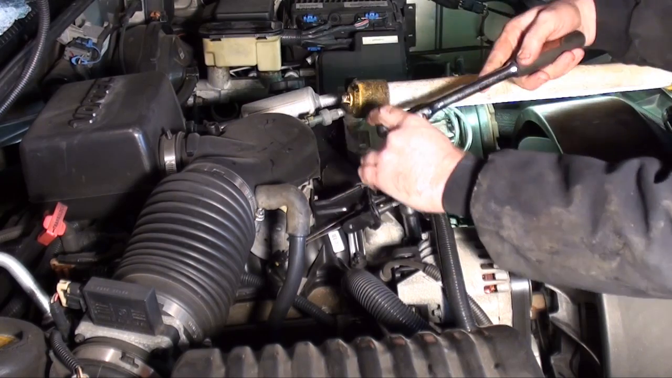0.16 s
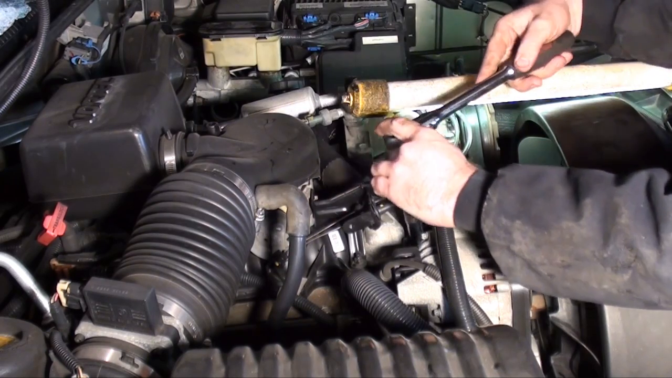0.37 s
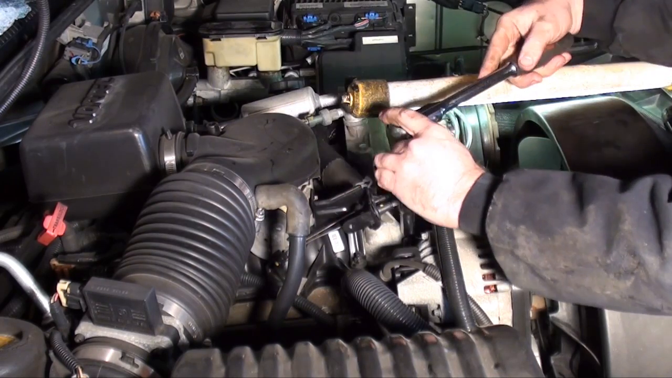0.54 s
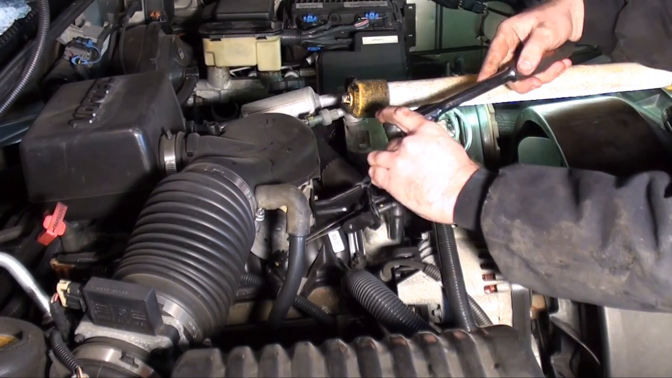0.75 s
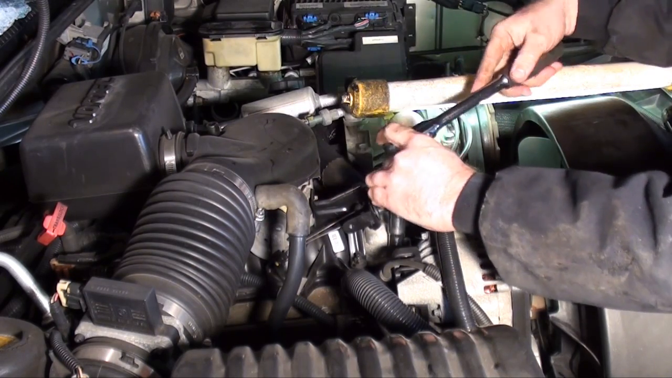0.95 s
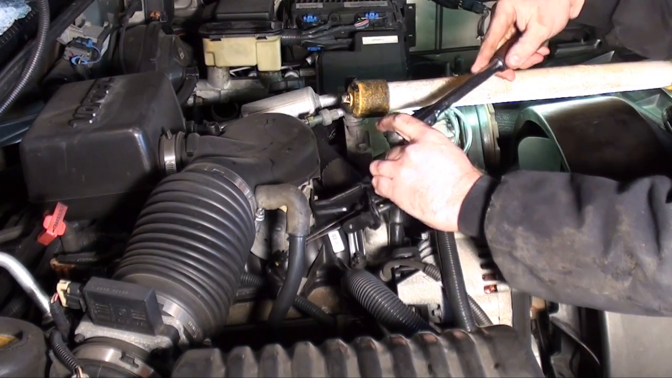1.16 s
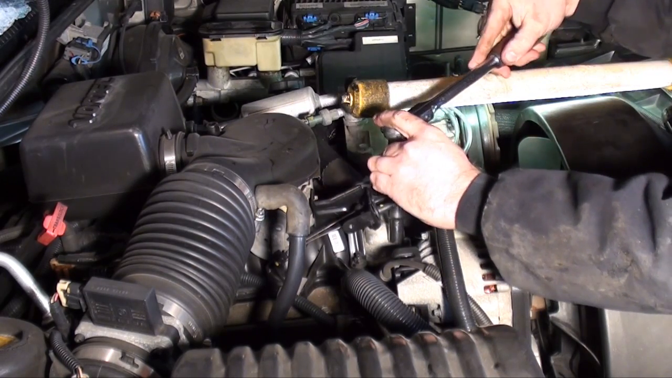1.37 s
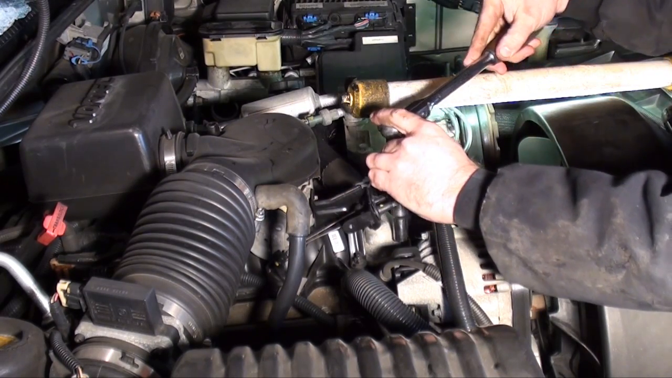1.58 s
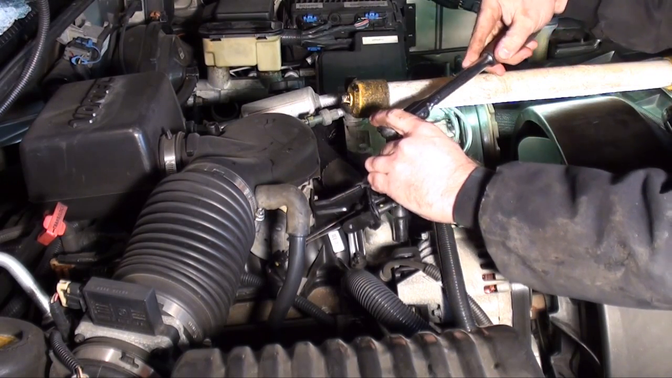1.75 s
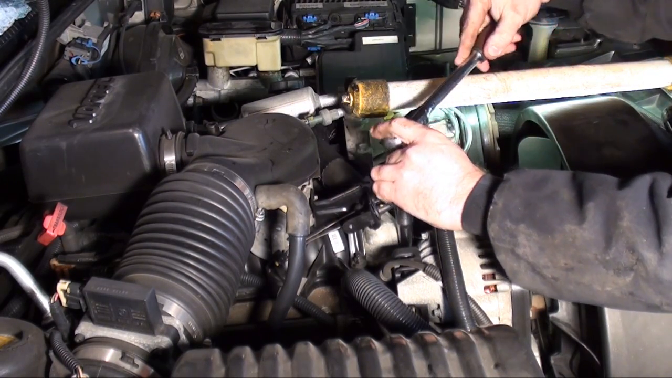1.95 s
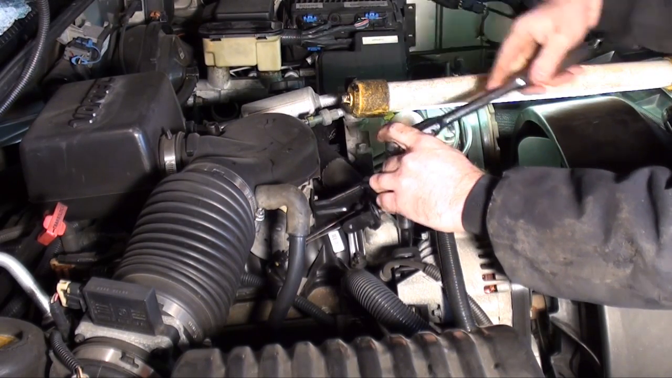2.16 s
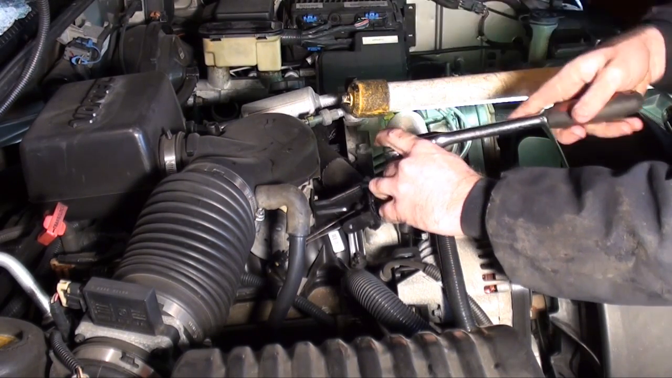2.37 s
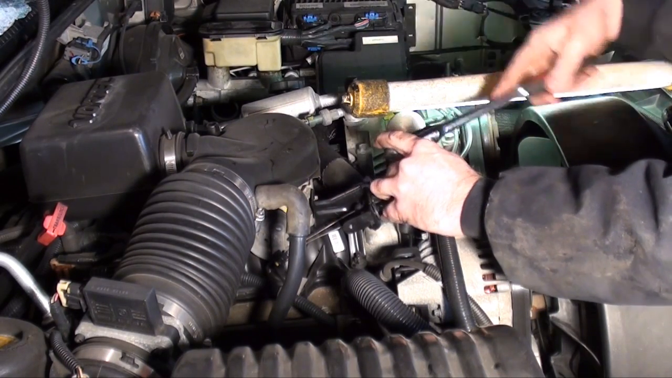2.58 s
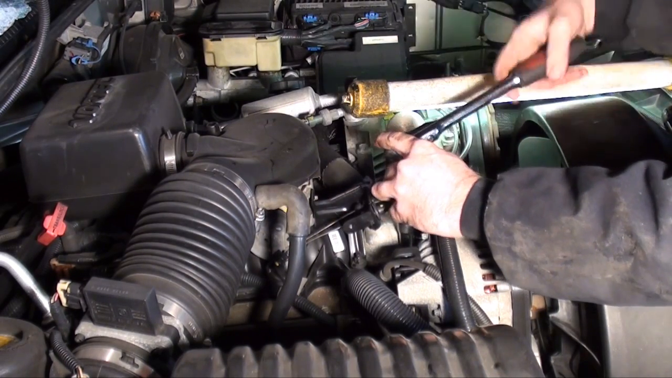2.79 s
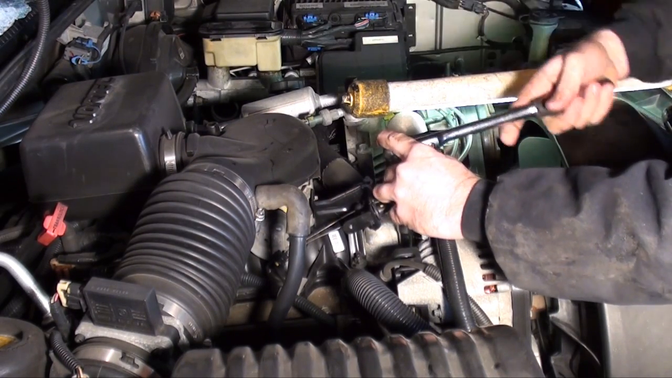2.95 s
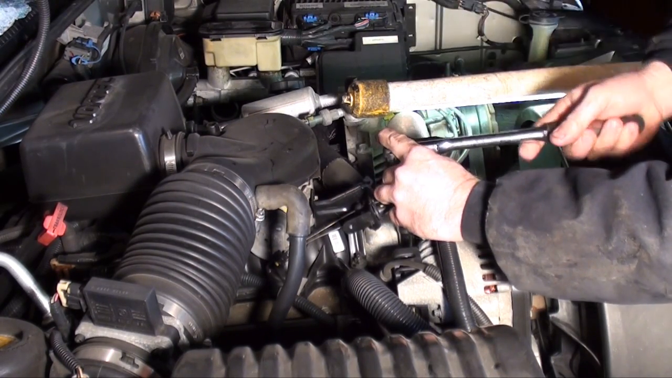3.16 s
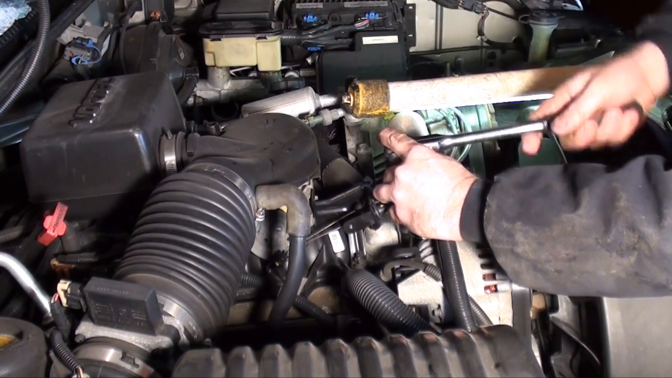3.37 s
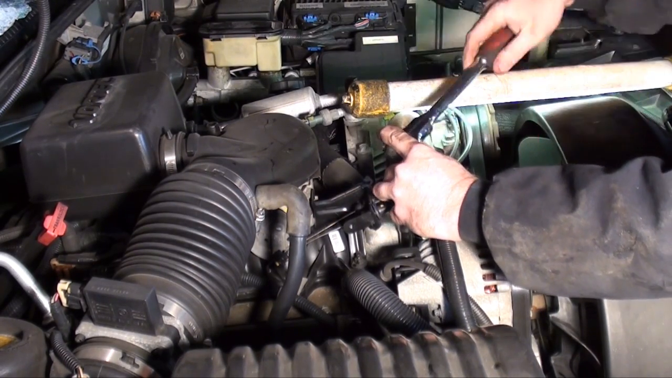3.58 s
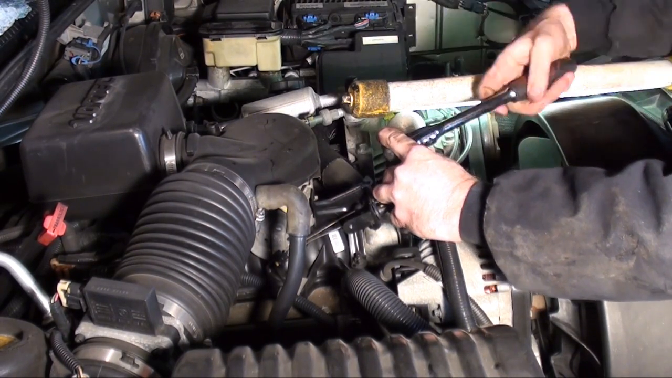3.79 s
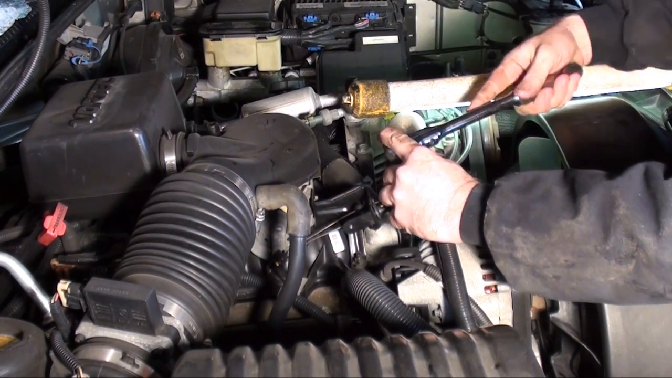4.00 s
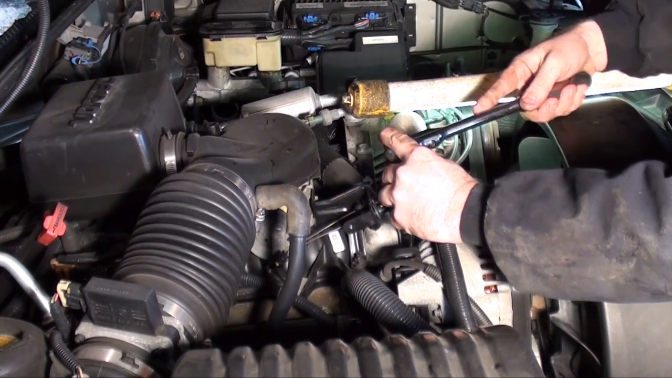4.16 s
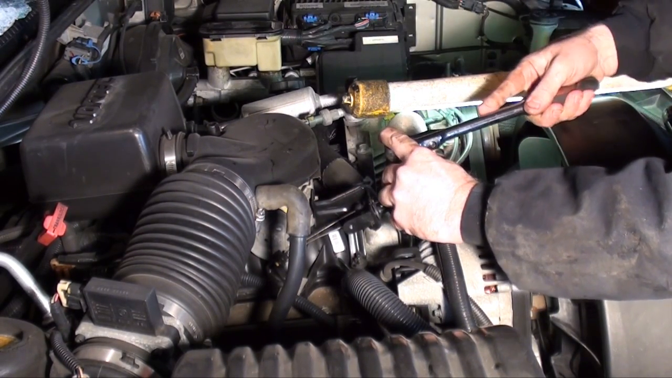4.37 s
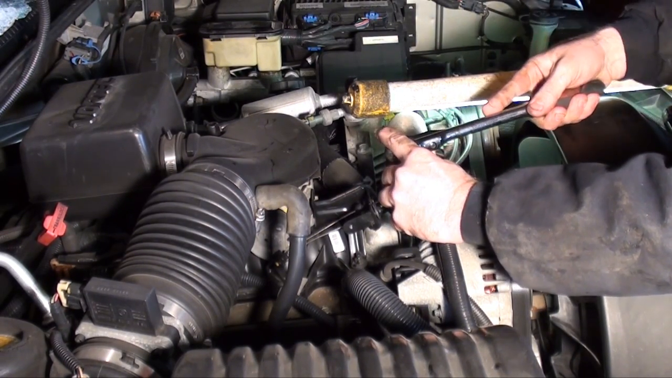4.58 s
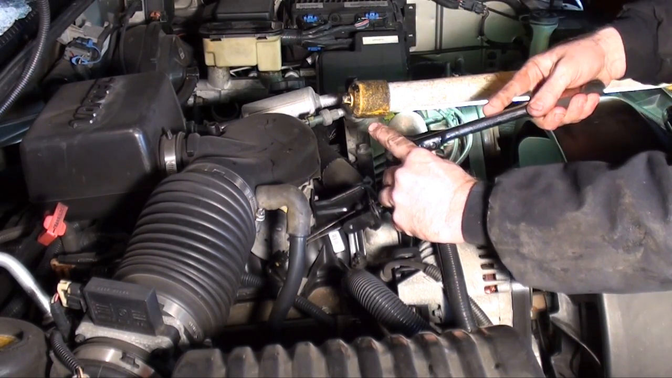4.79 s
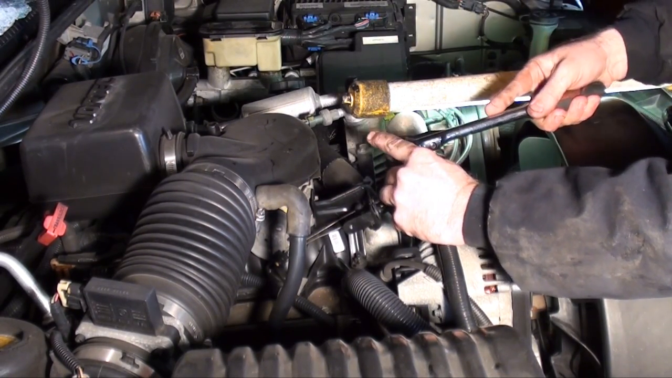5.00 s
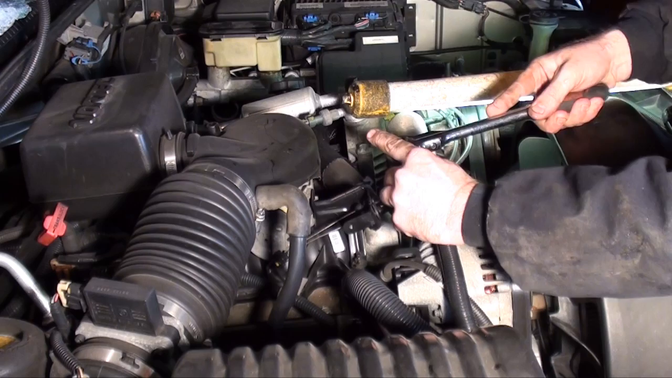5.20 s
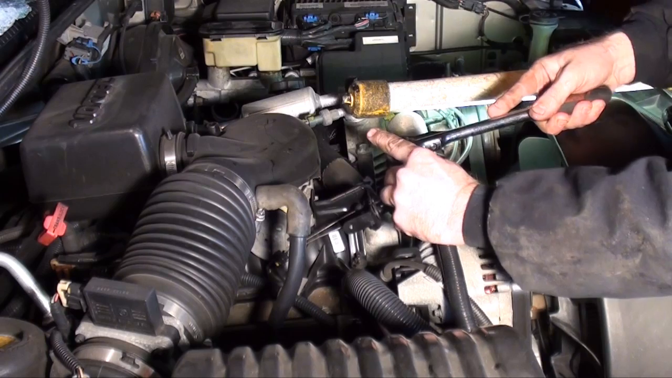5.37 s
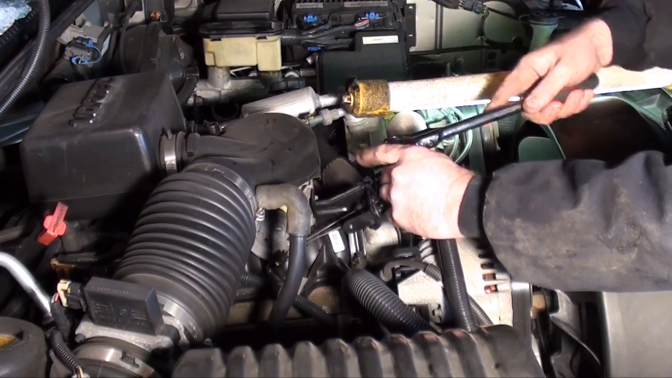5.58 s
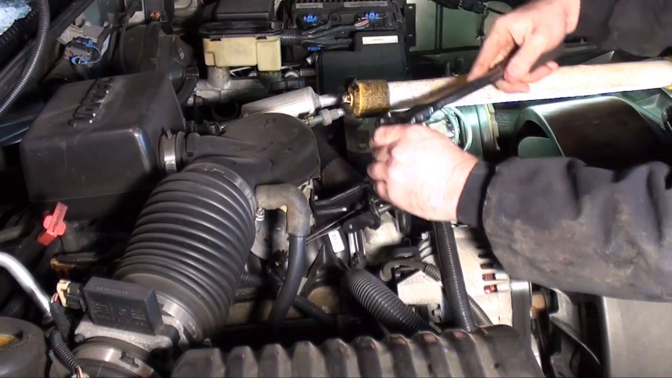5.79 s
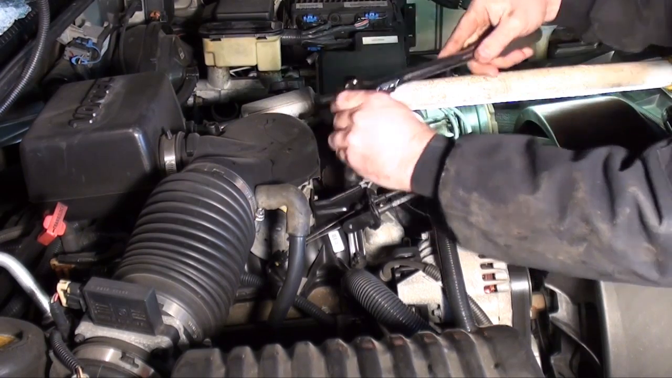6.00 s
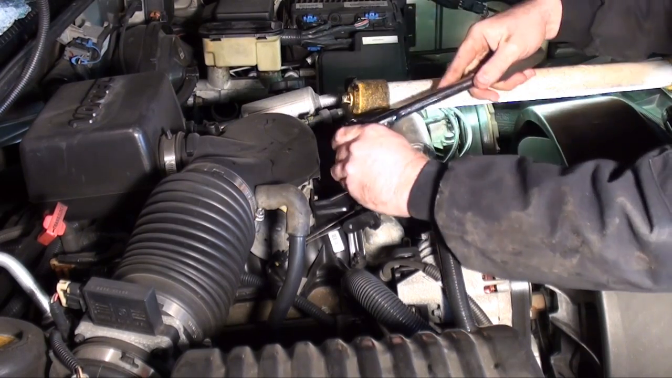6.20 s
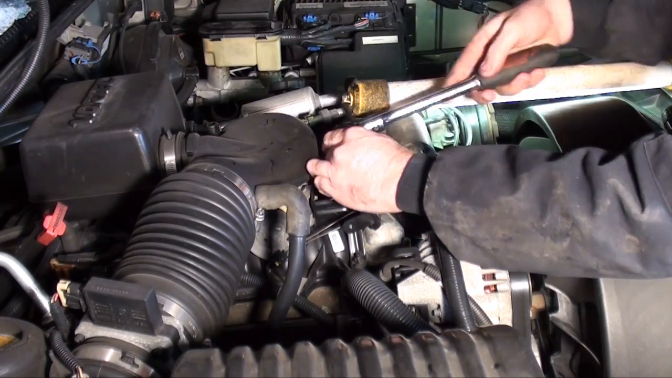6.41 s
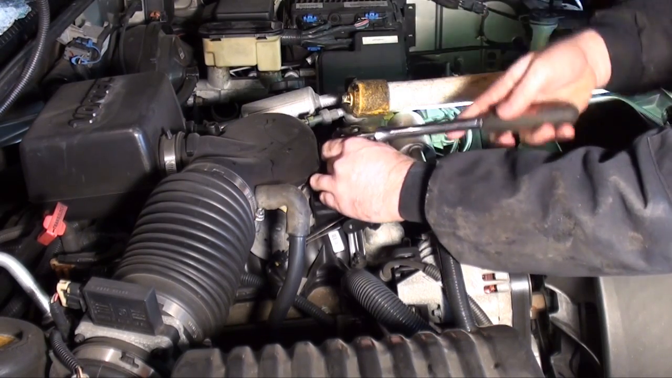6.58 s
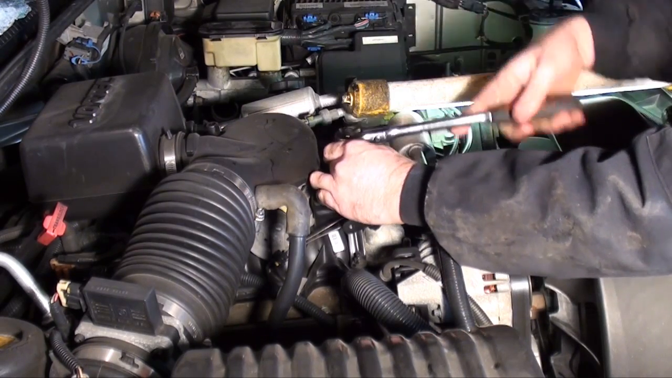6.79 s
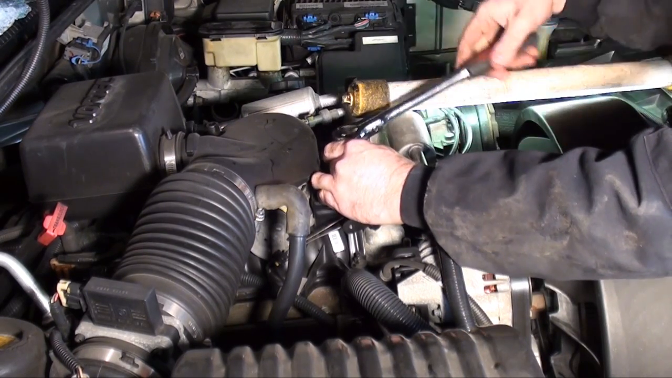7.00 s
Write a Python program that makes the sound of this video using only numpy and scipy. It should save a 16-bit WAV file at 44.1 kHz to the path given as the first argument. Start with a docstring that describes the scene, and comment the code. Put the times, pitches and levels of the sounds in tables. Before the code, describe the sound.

A hand socket ratchet tightens a bolt in an engine bay, about an arm's length from the microphone. Scattered clicks and sharp steel knocks come first, then two quick runs of ratcheting. After a lull with faint sleeve rustles, the clanking returns and ends in another fast run of clicks. The workshop adds a short ring over a faint heater hum and hiss.

```python
"""Hand ratchet in an engine bay

A ratchet on a long socket extension works an arm's length away. On the back swing the pawl clicks
over the gear teeth; at each reversal the slack in socket and extension knocks. Sleeve and fingers
brush the parts. The workshop rings on behind the hits, over a heater's hum, air noise and hiss."""
import sys
import numpy as np
from scipy import signal
from scipy.fft import rfft, irfft, next_fast_len
from scipy.io import wavfile
from scipy.ndimage import uniform_filter1d, minimum_filter1d

SR = 44100
rng = np.random.default_rng(int(sys.argv[2]) if len(sys.argv) > 2 else 0)


def generate_wav(signal):
    """Clip the signal to [-1, 1] and save it as 16-bit WAV at the path in sys.argv[1]."""
    frames = np.transpose(np.atleast_2d(signal))
    scaled = np.clip(frames, -1, 1) * 32767
    pcm = np.round(scaled).astype(np.int16)
    wavfile.write(sys.argv[1], SR, pcm)


N = 310902


def undb(db):
    return 10 ** (np.asarray(db) / 20)


def add(out, start_s, sound):
    i = int(start_s * SR)
    out[i:i + len(sound)] += sound[:N - i]


def coloured_noise(gain_at, length):
    """Noise of rms 1 whose spectrum follows gain_at(Hz)."""
    hz = np.maximum(np.fft.rfftfreq(length, 1 / SR), 1)
    noise = irfft(rfft(rng.standard_normal(length)) * gain_at(hz), length)
    return noise / np.sqrt(np.mean(noise ** 2))


def chatter(ms):
    """Rattling contact force of loose steel: holds for about ms, then dies."""
    t_ms = np.arange(SR // 16) / SR * 1000
    return rng.standard_normal(len(t_ms)) * np.exp(-(t_ms / max(ms, .1)) ** 1.77)


def strike(modes, force, crack_db):
    """One blow, peaking near 1: modes ring, never twice alike, over a crack of many unresolved ones."""
    hz, db, t60 = np.transpose(modes)
    detune, strength, phase = rng.standard_normal((3, len(hz)))
    t = np.arange(SR // 10) / SR
    rings = np.exp(np.outer(2j * np.pi * hz * (1 + 0.0096 * detune) - np.log(1000) / t60, t))
    weights = undb(db + 3 * strength) * np.exp(2j * np.pi * phase)
    hit = (weights @ rings).imag
    hit *= 1 - np.exp(-t / 0.00061)  # the force takes a moment to build
    hit[:len(force)] += undb(crack_db) * force
    # small parts radiate nothing far outside their modes
    band = signal.butter(3, (.85 * hz.min(), 1.05 * hz.max()), "band", fs=SR, output="sos")
    hit = signal.sosfilt(band, hit)
    loudest_rms = np.sqrt(uniform_filter1d(hit ** 2, size=64).max())
    return hit / loudest_rms / 2


# Modes of the bright head, short gear tick and clanking extension: f/Hz, relative level/dB, t60/s
HEAD_MODES = [(4915, 1, 0.014), (5130, -9.5, 0.077), (5700, 9.5, 0.011), (6280, 11.5, 0.011),
              (6895, 10.5, 0.016), (7440, 7.5, 0.022), (8030, 9, 0.019), (8670, 11.5, 0.012),
              (9200, 4, 0.011), (9900, -30, 0.009), (10010, -2.5, 0.014), (10550, -5, 0.017)]
GEAR_MODES = [(3680, -0.11, 0.018), (3937, -0.58, 0.0067)]
EXTENSION_MODES = [(1327, -0.5, 0.033), (1390, -8.5, 0.099), (1502, -6.5, 0.036), (1664, 5, 0.027),
                   (1994, 1, 0.022), (2185, 1, 0.022), (2586, 12.5, 0.011)]
# Click cues: t/s, head level/dB, gear level/dB
CLICKS = [(0.0024, -16.5, -34.5), (0.0494, -11.5, -16), (0.197, -19, -33.5), (0.2681, -16.5, -38),
          (0.4931, -12, -29), (0.9586, -13, -20.5), (1.2352, -13, -23), (1.348, -28, -30.5),
          (2.606, -9, -29), (2.6198, -11, -42), (2.6343, -8.5, -36.5), (2.6499, -8.5, -39),
          (2.6666, -12, -34.5), (2.686, -8, -27), (2.7225, -13, -62), (2.7652, -12.5, -25.5),
          (3.5033, -16, -23.5), (3.5237, -14, -30), (3.5399, -11, -19.5), (3.557, -12.5, -36),
          (3.5684, -14, -22), (3.5845, -9.5, -20), (3.6005, -17, -33), (3.6163, -12.5, -27),
          (3.6664, -15, -25), (5.1198, -30, -41), (6.8526, -15.5, -40), (6.8683, -15.5, -42),
          (6.882, -17.5, -40), (6.896, -14.5, -28.5), (6.9101, -16.5, -26.5), (6.9248, -11.5, -31),
          (6.939, -17, -28), (6.9603, -14, -27.5), (7.024, -14, -37)]


def pawl_clicks():
    """The pawl drops behind a tooth, snaps and rebounds in the head; gear and extension ring along."""
    out = np.zeros(N)
    gaps_s = np.diff(np.transpose(CLICKS)[0], prepend=-1)
    speeds = 1 / (1 + (gaps_s / 0.014) ** 6)  # nears 1 for teeth under 14 ms apart
    scatter = rng.standard_normal((len(CLICKS), 2))
    for (start, head_db, gear_db), speed, (late, hard) in zip(CLICKS, speeds, scatter):
        add(out, start, undb(head_db) * strike(HEAD_MODES, chatter(ms=1.0), crack_db=12.7))
        add(out, start, undb(gear_db) * strike(GEAR_MODES, chatter(ms=3.4), crack_db=3.4))
        add(out, start, undb(head_db - 22) * strike(EXTENSION_MODES, chatter(ms=7.4), crack_db=31))
        rebound_s = start + (3.4 + 0.7 * late) / 1000
        rebound_db = head_db - 7.5 + 7 * speed + 2.5 * hard  # harder when teeth pass quickly
        add(out, rebound_s, undb(rebound_db) * strike(HEAD_MODES, chatter(ms=3.2), crack_db=14.7))
    return out


# Modes of socket, handle, steel bracket and hollow plastic covers: f/Hz, relative level/dB, t60/s
SOCKET_MODES = [(2736, -13.5, 0.028), (2965, 13.5, 0.0065), (3490, -21, 0.03), (3944, -2, 0.028),
                (3790, -60, 0.05)]
HANDLE_MODES = [(4605, -3.5, 0.11), (4980, 0.5, 0.098), (5347, 13, 0.022), (5800, 4, 0.061),
                (6220, 19.5, 0.01), (6670, 6.5, 0.034)]
BRACKET_MODES = [(718, -1, 0.031), (881.5, -1, 0.062), (963, -1.7, 0.017)]
COVER_MODES = [(193.7, -4, 0.72), (286, 0.5, 0.018), (461.4, 7.5, 0.13)]
# Knock cues: t/s, extension level/dB, head level/dB, bracket level/dB, chatter/ms, favoured f/Hz
SLACK_KNOCKS = [(0.174, -35, -56, -33.5, 4, 1310), (0.253, -12.5, -29, -30, 2.4, 2020),
                (0.3602, -15.5, -24, -39, 4.5, 2480), (0.5095, -14, -18.5, -39.5, 2.9, 2410),
                (0.571, -36, -53, -48, 3.3, 1410), (0.594, -33.5, -59, -37, 4.4, 1600),
                (0.7144, -34, -45, -43, 6.4, 1390), (0.7494, -20.5, -30, -38, 2.9, 1330),
                (0.834, -10.5, -21.5, -33, 1.3, 2130), (1.0056, -20, -49, -39, 3.8, 1540),
                (1.0246, -23.5, -53, -37, 3.2, 1630), (1.1056, -12.5, -17, -43, 2.8, 2380),
                (1.119, -35, -46, -54, 4, 2150), (1.1423, -17, -23, -34.5, 7.8, 1410),
                (1.188, -40, -33.5, -33.5, 4, 1900), (1.3417, -38, -40, -40, 13, 1530),
                (1.426, -39, -66, -65, 2.7, 1640), (1.6508, -11.5, -19, -32, 5.2, 2050),
                (1.89, -42, -47, -50, 3.2, 1370), (1.9136, -9, -25, -31, 3.2, 2440),
                (1.9787, -32, -34, -42, 4, 2200), (2.034, -7, -7, -28.5, 6.5, 2120),
                (2.4077, -36.5, -48, -36.5, 9, 1500), (2.541, -14, -21.5, -32, 10.4, 2030),
                (2.5554, -24.5, -21, -28.5, 7.8, 1480), (2.8015, -33.5, -45, -41, 4, 1540),
                (3.0499, -60, -39, -52, 2.8, 2000), (3.4482, -33.5, -46, -39, 5.2, 1690),
                (3.4679, -50, -41, -47, 2.6, 2000), (3.7204, -34.5, -56, -40.5, 4.3, 1520),
                (4.2936, -45, -44, -52, 2.9, 1900), (4.6618, -45.5, -58, -62, 4.7, 1670),
                (5.5097, -56, -47.5, -66, 4, 1900), (5.698, -46, -53, -63, 3.2, 2320),
                (5.7264, -40, -49, -53, 5.8, 2580), (5.7403, -35.5, -45, -46.5, 1.9, 2200),
                (5.7692, -13.5, -24, -34, 7.5, 2700), (5.811, -23, -26, -24, 4.4, 2270),
                (5.8164, -20.5, -35, -45, 1.7, 2430), (5.8276, -17.5, -22, -42, 3.1, 1920),
                (6.164, -37.5, -54, -55, 5.4, 1600), (6.2356, -13.5, -17.5, -33, 4.4, 2480),
                (6.2626, -22.5, -30, -46, 4.5, 1910), (6.3609, -13, -22.5, -36.5, 8.3, 1820),
                (6.3792, -14.5, -12, -35, 6.9, 1890), (6.474, -46, -42, -50, 3, 1430),
                (6.5969, -33.5, -38, -35, 7, 1500), (6.811, -39, -51, -48, 1.5, 1660)]


def slack_knocks():
    """The slack closes: one chattering contact drives the tool and the bracket and covers nearby."""
    out = np.zeros(N)
    for start, extension_db, head_db, bracket_db, ms, favoured_hz in SLACK_KNOCKS:
        force = chatter(ms)
        # extension modes fade by 12.5 dB per octave away from the favoured pitch
        focused_modes = [(hz, db - 12.5 * abs(np.log2(hz / favoured_hz)), t60)
                         for hz, db, t60 in EXTENSION_MODES]
        # the socket sits between extension and head, and rings more on high-pitched knocks
        socket_db = extension_db + 0.39 * (head_db - extension_db) + 1.5
        socket_db += 6.5 * np.log2(favoured_hz / 2058)
        for modes, db, crack_db in [(focused_modes, extension_db, 7.4),
                                    (SOCKET_MODES, socket_db, 11.4),
                                    (HANDLE_MODES, head_db + 1.7, 5.3),
                                    (HEAD_MODES, head_db, 4.55),
                                    (BRACKET_MODES, bracket_db, 8.2),
                                    (COVER_MODES, bracket_db - 12, 13)]:
            add(out, start, undb(db) * strike(modes, force, crack_db))
    return out


# Thin, high ping: t/s, f/Hz, level/dB, t60/s
STEEL_PINGS = [(6.383, 6680, -35, .42)]


def steel_ping():
    """A loose steel part rings on in one pure mode after a knock."""
    out = np.zeros(N)
    t = np.arange(SR // 2) / SR
    for start, hz, db, t60 in STEEL_PINGS:
        add(out, start, undb(db) * np.sin(2 * np.pi * hz * t) * np.exp(-np.log(1000) * t / t60))
    return out


# Handling cues: t/s, length/s, level/dB, centre f/Hz, spread/octaves
SLEEVE_RUBS = [(1.163, 0.05, -49, 900, 2.9), (1.185, 0.079, -55, 210, 0.49), (2.315, 0.1, -54.5, 4930, 2.4),
               (2.401, 0.046, -47.5, 900, 2.5), (3.01, 0.099, -46.5, 3970, 2.8),
               (3.032, 0.044, -52, 340, 1.4), (3.242, 0.059, -55.5, 370, 0.51),
               (3.451, 0.043, -52, 1190, 2.5), (4.29, .14, -62.5, 700, 1.9), (4.63, 0.072, -66, 1200, 1.6),
               (5.011, 0.18, -71, 500, 1.5), (5.374, 0.28, -79, 1500, 2.9), (5.799, 0.042, -29, 2500, 1.35),
               (5.8, 0.057, -48.5, 280, 1.3), (6.587, 0.017, -54.5, 1460, 2.5)]


def sleeve_rubs():
    """Sleeve and fingers brush the parts in short swells of grainy noise."""
    out = np.zeros(N)
    for start, length_s, db, hz, octaves in SLEEVE_RUBS:
        size = int(length_s * SR)
        grain = undb(26.28 * uniform_filter1d(rng.standard_normal(SR // 2), 64))
        friction = grain * coloured_noise(lambda f: np.exp(-(np.log2(f / hz) / octaves) ** 2), SR // 2)
        add(out, start, undb(db) * friction[:size] * np.hanning(size) ** .5)
    return out


def bay_reflections(hits):
    """The engine bay throws back quick, dense reflections, partly unlike left and right."""
    t = np.arange(SR // 10) / SR
    mid, side = (coloured_noise(lambda f: 1 / (1 + (f / hz) ** 2), len(t)) for hz in (8000, 3500))
    mid = undb(-33.5) * np.exp(-t / 0.014) * mid
    side = undb(-44) * np.exp(-t / 0.004) * side
    return np.array([signal.oaconvolve(hits, response)[:N] for response in (mid + side, mid - side)])


# Room tail: f/Hz, t60/s, level/dB, side minus mid/dB
WORKSHOP_TAIL = [(200, 0.65, -8.5, -31), (630, 0.33, 7, -18.5), (1230, 0.64, -4, -13),
                 (2460, 0.56, -6, -22), (4730, 0.51, -8.5, -58), (10000, 0.28, -8.5, -52),
                 (12200, 0.75, -18, -34)]


def workshop_reverb(hits):
    """The energy in each narrow band feeds a diffuse, nearly mono field that dies away."""
    hop = 64
    frames = dict(fs=SR, nperseg=256, noverlap=256 - hop)
    f, _, spectrum = signal.stft(hits, **frames)
    hz, *columns = np.transpose(WORKSHOP_TAIL)
    t60, db, side_db = (np.interp(np.log(f + 1), np.log(hz), column) for column in columns)
    kept_per_hop = np.exp(-2 * np.log(1000) * hop / (t60 * SR))
    energy = np.array([signal.lfilter([0, 0, 0, 1 - kept], [1, -kept], band)  # three hops of pre-delay
                       for kept, band in zip(kept_per_hop, np.abs(spectrum) ** 2)])
    mid_noise, side_noise = (signal.stft(rng.standard_normal(N), **frames)[2] for _ in range(2))
    gain = undb(db)[:, None] * np.sqrt(energy / np.mean(np.abs(mid_noise) ** 2))
    mid = signal.istft(gain * mid_noise, **frames)[1][:N]
    side = signal.istft(gain * undb(side_db)[:, None] * side_noise, **frames)[1][:N]
    return np.array([mid + side, mid - side])


# Colour of the room tone: f/Hz, relative level/dB
AIR_COLOUR = [(12, -70), (20, -27), (60, -15), (97, -11.5), (130, -5), (156, -6.5), (289, -10),
              (387, -12.5), (431, -11), (660, -13), (735, -10.5), (1160, -17.5), (1360, -14.5), (1920, -18),
              (11800, -24), (15300, -97), (22000, -120)]
# Extra EQ on its side channel: f/Hz, relative level/dB
AIR_WIDTH = [(60, -3), (110, -12), (200, -2), (350, 7.5), (630, 9), (1140, 11), (2060, 8.5), (3720, -4.5),
             (6700, -35), (12100, -12)]


def room_air():
    """A steady bed of air noise and microphone hiss, widest in the mids."""
    def eq(table, f):
        hz, db = np.transpose(table)
        return undb(np.interp(np.log(f), np.log(hz), db))

    length = next_fast_len(N)
    mid = coloured_noise(lambda f: eq(AIR_COLOUR, f), length)
    side = undb(-10) * coloured_noise(lambda f: eq(AIR_COLOUR, f) * eq(AIR_WIDTH, f), length)
    return undb(-55.5) * np.array([mid + side, mid - side])[:, :N]


# Heater fader moves: t/s, rumble level/dB, hum level/dB
HEATER_FADERS = [(0.0, -67, -57), (0.33, -70, -56.5), (0.61, -71, -68), (0.8, -72, -56), (1.0, -78, -62.5),
                 (2.0, -69, -69), (2.9, -70, -68), (3.6, -74, -76), (4.6, -80, -67), (5.6, -77, -74),
                 (6.3, -70, -68), (6.7, -66.5, -69), (7.05, -61, -59)]


def heater(rumble_hz=72, hum_hz=119.7, hum_width_hz=6):
    """The heater rumbles and hums; the hum is a noise band so narrow that it wavers."""
    times, rumble_db, hum_db = np.transpose(HEATER_FADERS)
    length = next_fast_len(N)
    t = np.arange(N) / SR
    rumble = coloured_noise(lambda f: np.exp(-(np.log2(f / rumble_hz) / 0.36) ** 2), length)[:N]
    hum = coloured_noise(lambda f: 1 / (1 + ((f - hum_hz) / hum_width_hz) ** 2), length)[:N]
    return undb(np.interp(t, times, rumble_db)) * rumble + undb(np.interp(t, times, hum_db)) * hum


def scene():
    """The tool, off axis and so short of its highest treble, sounds in bay and workshop over the bed."""
    off_axis = signal.cheby1(8, .5, 11350, fs=SR, output="sos")
    hits = signal.sosfilt(off_axis, pawl_clicks() + slack_knocks() + steel_ping() + sleeve_rubs())
    return hits + bay_reflections(hits) + workshop_reverb(hits) + room_air() + heater()


def record(dry):
    """A fast limiter ducks the loudest peaks, then a steep low-pass cuts the top."""
    ceiling_db, window_s, top_hz = -6, .004, 11800
    size = int(window_s * SR)
    allowed_gain = np.minimum(1, undb(ceiling_db) / (np.abs(dry).max(axis=0) + 1e-9))
    gain = uniform_filter1d(minimum_filter1d(allowed_gain, size=size), size=size)
    return signal.sosfilt(signal.ellip(8, .3, 60, top_hz, fs=SR, output="sos"), gain * dry)


dry = scene()
out = record(dry)
generate_wav(out)
```